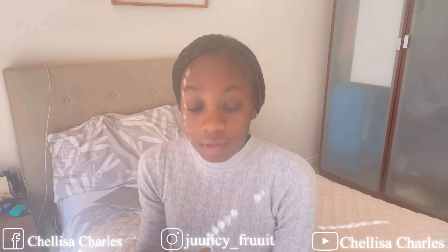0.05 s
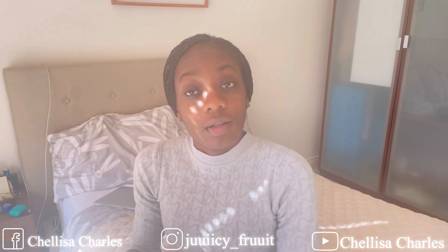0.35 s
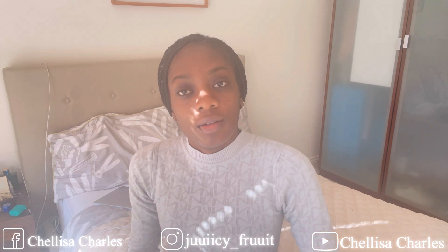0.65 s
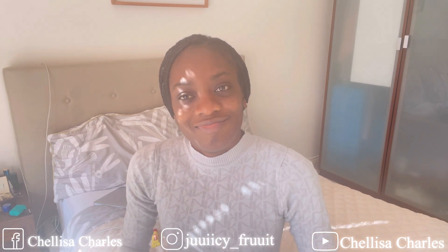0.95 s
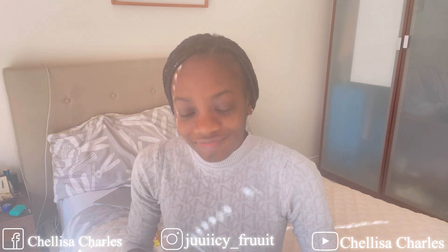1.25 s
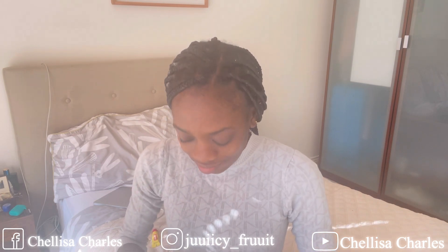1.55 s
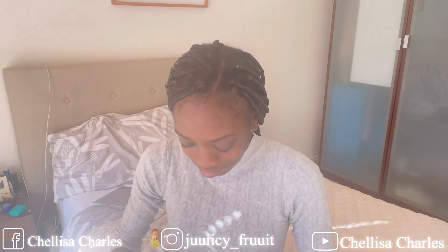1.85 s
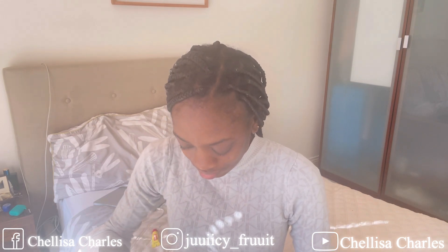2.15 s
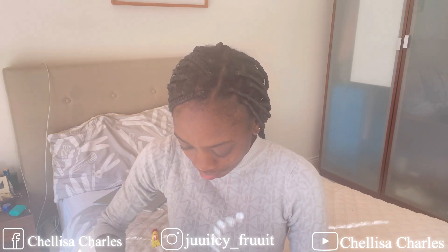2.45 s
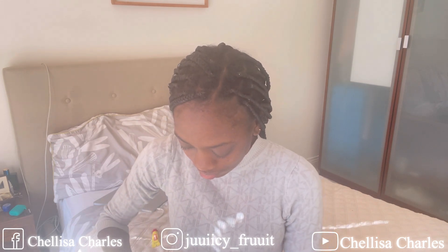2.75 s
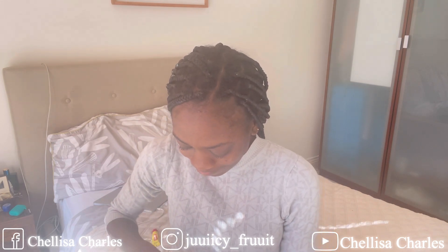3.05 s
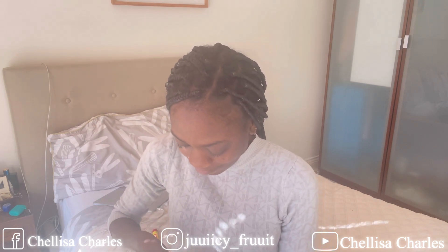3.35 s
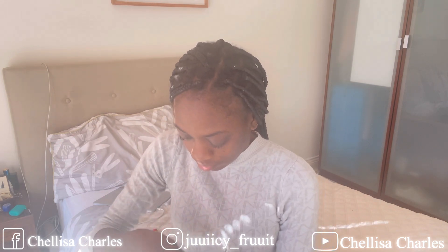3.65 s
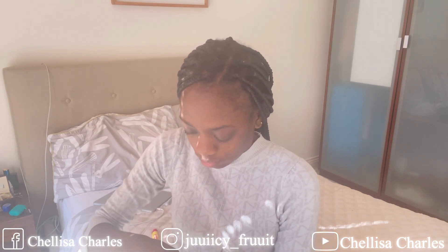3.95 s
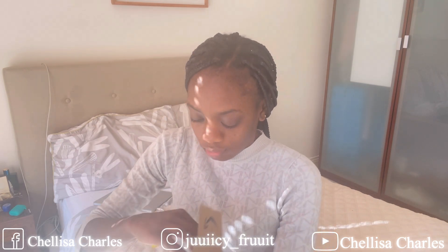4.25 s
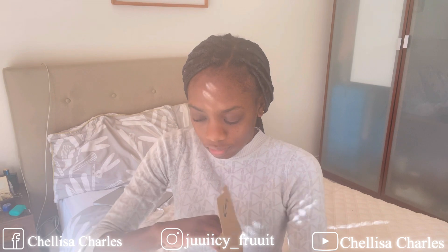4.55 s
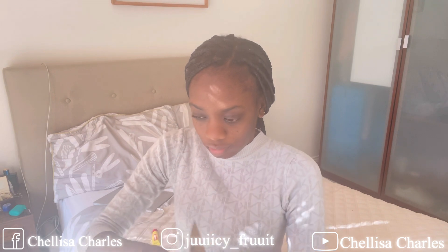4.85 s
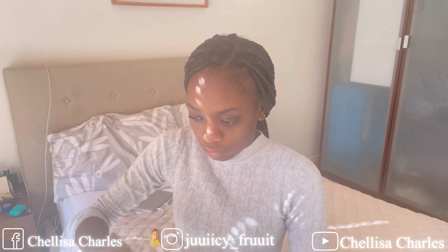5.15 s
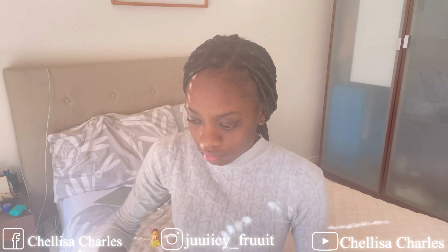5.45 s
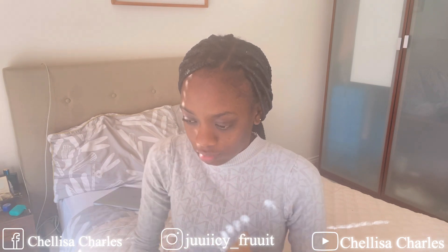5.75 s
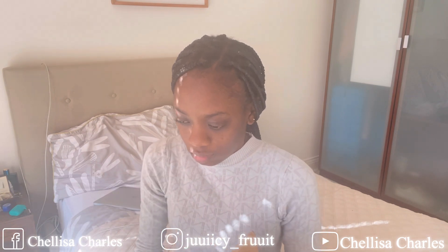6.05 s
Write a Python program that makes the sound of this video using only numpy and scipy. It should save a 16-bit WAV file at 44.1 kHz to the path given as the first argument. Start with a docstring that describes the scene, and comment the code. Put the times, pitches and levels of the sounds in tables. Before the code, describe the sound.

Hands turn a cardboard parcel on a bed, close by in a small bedroom with a short echo and faint steady noise. Paper slides and crinkles softly from the start, with a hollow snap at about 0.5 seconds and a louder one near 1 second. A smaller snap follows at 1.3, then a faint thin hiss swells and fades until about 2.3. A very sharp crack comes at 2.1, followed by light rustling. From about 2.9 to 3.6 seconds one long, loud rip runs in jerks, its fibres crackling and the box ringing hollowly. A deep bump on the bed comes near 3.2, just before the hardest crack of the rip. Another snap and a softer thud land near 3.9. Quieter sliding, crinkling and small taps continue, swelling around 5.7 with a scrape and a low bump, and two last snaps come just after 6 seconds.

```python
"""Paper slides and crinkles under hands as a cardboard parcel is turned on a bed in a small bedroom.
Stiff panels buckle with sharp snaps and a hollow ring; bumps on the bed boom at the lowest room mode.
A thin hiss passes, then one long rip runs in jerks, its breaking fibres making the box sing.
More handling follows. The room echoes briefly over faint steady noise; peaks past full scale clip."""
import sys
import numpy as np
from scipy import signal
from scipy.fft import rfft, irfft, next_fast_len
from scipy.io import wavfile
from scipy.ndimage import uniform_filter1d

SR = 44100
rng = np.random.default_rng(int(sys.argv[2]) if len(sys.argv) > 2 else 0)


def digitize_waveform(pressure):
    """Quantize a signal to 16-bit integers and store it at the path in sys.argv[1].

    Rows of a 2-D input are taken as channels; values are limited to [-1, 1].
    """
    field = np.atleast_2d(pressure).T
    bounded = np.clip(field, -1, 1)
    quanta = np.round(bounded * 32767).astype(np.int16)
    wavfile.write(sys.argv[1], SR, quanta)


N = 273420
TIME_S = np.arange(N) / SR
TAPS = 8192
FILTER_HZ = np.fft.rfftfreq(TAPS, 1 / SR)
BOOM_HZ, BOOM_T60_S = 69.4, 0.37  # lowest room mode


def amp(db):
    """Decibels to gain."""
    return 10 ** (np.asarray(db) / 20)


def unit_rms(x):
    """Scales to rms 1."""
    return x / np.sqrt(np.mean(x ** 2) + 1e-20)


def curve_at(points, hz):
    """Interpolates a table on a log-frequency axis."""
    point_hz, values = np.transpose(points)
    return np.interp(np.log(hz + 1), np.log(point_hz), values)


def add(mix, start_s, sound):
    """Mixes a sound in at start_s."""
    part = mix[max(round(start_s * SR), 0):][:len(sound)]
    part += sound[:len(part)]


def colour(spectrum, modes):
    """Gain curve: a smooth spectrum lifted by modes (centre in Hz, width in Hz, lift in dB)."""
    gain = amp(curve_at(spectrum, FILTER_HZ))
    for hz, width_hz, lift_db in modes:
        bell = 1 / (1 + (2 * (FILTER_HZ - hz) / width_hz) ** 2)
        gain = gain * np.sqrt(1 + (amp(lift_db) ** 2 - 1) * bell)
    return gain


def causal_phase(gain):
    """Minimum-phase factor: the filter starts at once and rings afterwards."""
    log_gain = np.log(np.maximum(gain / gain.max(), 1e-5))
    mirrored = np.concatenate([log_gain, log_gain[-2:0:-1]])
    return np.exp(-1j * signal.hilbert(mirrored).imag[:len(gain)])


def whiten(x):
    """Gives clicks or echoes equal power in every band and energy near 1."""
    spectrum = rfft(x, SR)
    power = uniform_filter1d(abs(spectrum) ** 2, 300, axis=-1)
    return irfft(spectrum / np.sqrt(power + 1e-12))[..., :x.shape[-1]]


def grains(count, per_s, spread_db, hiss):
    """Tiny fibre breaks of very unequal size over a smooth friction hiss."""
    sizes = amp(spread_db * np.minimum(rng.exponential(1, count), 4))
    breaks = sizes * rng.choice([-1, 1], count) * (rng.random(count) < per_s / SR)
    return unit_rms(unit_rms(breaks) + hiss * rng.standard_normal(count))


# Cross-fades between the four bands. Each pair: start in Hz, end in Hz.
CROSSFADES_HZ = [105, 150, 850, 1150, 2500, 5200]


def bands(gain):
    """Splits a gain curve into bump, panel, crinkle and fizz bands, each of power 1."""
    shares = np.repeat(np.eye(4), 2, axis=1)[:, 1:-1]
    return np.array([unit_rms(gain * np.interp(FILTER_HZ, CROSSFADES_HZ, share)) for share in shares])


def friction(drive, gain, band_levels, catch_db, catch_s):
    """Grains ring the sheet under a motion that keeps catching and slipping."""
    knots_s = np.arange(0, TIME_S[-1] + catch_s, catch_s)
    grip = amp(catch_db * np.interp(TIME_S, knots_s, rng.standard_normal(len(knots_s))))
    lead = TAPS // 8
    kernels = np.roll(irfft(bands(gain) * causal_phase(gain)), lead, axis=1)
    parts = signal.oaconvolve(unit_rms(drive * grip)[None], kernels, axes=1)[:, lead:lead + N]
    return (band_levels * parts).sum(0)


def stroke_db(t, start_s, swell_s, ease_s):
    """Level of one stroke: it touches, speeds up, slows down and lets go."""
    touch_db_per_s, lift_db_per_s = 520, 280
    peak_s = start_s + swell_s
    end_s = peak_s + ease_s
    speed_db = np.interp(t, [start_s, peak_s, end_s], [-7, 0, -8.5])
    touch_db = touch_db_per_s * np.minimum(t - start_s, 0)
    lift_db = lift_db_per_s * np.minimum(end_s - t, 0)
    return speed_db + touch_db + lift_db


# Rubbed paper. Each row: frequency in Hz, relative density in dB.
PAPER_SPECTRUM = [(40, -19.5), (110, -15), (160, -8), (250, -3.5), (380, -.5), (700, -3.5), (820, -7),
                  (1020, -.5), (1500, -5.5), (2400, -9.5), (3200, -16), (5000, -16.5), (7500, -27),
                  (11000, -22.5), (15500, -31)]
# A hand or flap slides. Each row: start, swell, ease in seconds; bump, panel, crinkle, fizz in relative dB.
PAPER_STROKES = [(0, .01, .11, -43, -39, -42, -49), (.09, .1, .09, -50, -34, -34, -31.5),
                 (.3, .03, .12, -50, -41, -43, -47), (.45, .05, .06, -52, -33, -43, -51),
                 (.59, .08, .03, -37, -39, -42, -43), (.73, .02, .15, -53, -38, -45, -51),
                 (1.2, .22, .27, -61, -43, -48, -56), (1.76, .06, .07, -61, -44, -42, -49),
                 (1.91, .06, .12, -68, -55, -47, -53), (2.18, .05, .08, -56, -34, -35, -42),
                 (2.36, .1, .12, -53, -39, -41, -46), (2.58, .07, .07, -82, -34, -34, -35),
                 (2.795, .04, .03, -78, -37, -37, -37), (3.67, .02, .06, -46, -38, -58, -74),
                 (3.86, .09, .06, -45, -41, -35, -34), (4.1, .18, .03, -66, -45, -43, -38),
                 (4.33, .06, .03, -45, -36, -36, -42), (4.47, .035, .05, -62, -41, -45, -40),
                 (4.64, .03, .11, -54, -34, -37, -54), (4.785, .04, .14, -35, -35, -36, -34),
                 (4.98, .1, .15, -38, -33, -36, -44), (5.22, .12, .08, -40, -32, -34, -39),
                 (5.42, .08, .1, -37, -27.5, -38, -43), (5.61, .08, .05, -40, -21, -24, -31),
                 (5.74, .02, .13, -35, -27, -27, -41), (5.98, .07, .05, -60, -36, -34, -42),
                 (6.12, .07, .04, -37, -26, -34, -44)]


def handling():
    """Paper rubs on paper and on hands; overlapping strokes add in power."""
    drive = grains(N, per_s=1000, spread_db=4.4, hiss=0.85)
    gain = colour(PAPER_SPECTRUM, [(BOOM_HZ, 18, 7), (385, 80, 3), (540, 70, 3), (670, 70, 3)])
    steps_s, power = TIME_S[::100], 0
    for start_s, swell_s, ease_s, *bands_db in PAPER_STROKES:
        envelope_db = stroke_db(steps_s, start_s, swell_s, ease_s)
        power = power + amp(np.add.outer(bands_db, envelope_db)) ** 2
    levels = np.array([np.interp(TIME_S, steps_s, np.sqrt(band)) for band in power])
    return amp(-0.6) * friction(drive, gain, levels, catch_db=.8, catch_s=0.013)


# Room noise. Each row: frequency in Hz, relative density in dB.
AIR_SPECTRUM = [(30, -22), (70, -2), (130, -6.5), (370, -1), (700, -4), (1000, -14), (2500, -12),
                (5000, -15), (7500, -34), (15500, -36)]


def air():
    """Faint steady room noise, half its power common to both channels."""
    gain = amp(curve_at(AIR_SPECTRUM, np.fft.rfftfreq(N, 1 / SR)))
    left, right, shared = irfft(rfft(rng.standard_normal((3, N))) * gain, N)
    return amp(-57) * unit_rms(np.array([left, right]) + shared)


# Struck cardboard. Each row: frequency in Hz, relative density in dB.
CARD_SPECTRUM = [(40, -15.5), (130, -15), (260, -2), (500, -0.5), (720, 1.5), (1100, -4), (1500, -4),
                 (2400, -5), (3200, -11), (5500, -16.5), (7500, -25), (10500, -23), (15500, -31.5)]


def strike(drive, mode, levels_db, panel_lift_db, bump_re_panel_db):
    """A short force rings a cardboard panel; its bass follows the panel level."""
    ring_db, crinkle_db, fizz_db = levels_db
    panel_db = (ring_db + crinkle_db) / 2 + panel_lift_db
    band_levels = amp([panel_db + bump_re_panel_db, panel_db, crinkle_db, fizz_db])
    gain = band_levels @ bands(colour(CARD_SPECTRUM, [mode]))
    return signal.fftconvolve(drive, irfft(gain * causal_phase(gain)))


# Buckles and taps. Each row: start in seconds, ring in Hz; ring, crinkle, fizz in relative dB.
PANEL_SNAPS = [(.354, 370, -47, -44, -34), (.546, 400, -16, -27.5, -45), (.733, 396, -31, -46, -47),
               (.951, 577, -8.5, -11, -14.5), (1.21, 700, -39, -42, -46), (1.31, 400, -50, -47, -51),
               (1.32, 400, -23, -29.5, -35), (2.101, 820, -18, -17, -37), (2.108, 500, -8, -4, -21),
               (2.341, 297, -34, -41, -58), (2.369, 323, -42, -44, -39), (2.539, 503, -28, -44, -50),
               (2.647, 410, -31, -42, -45), (2.797, 557, -38, -47, -44), (3.254, 678, -15, -25, -30),
               (3.273, 670, -1, -30, -25), (3.369, 712, -13, -26, -40), (3.4, 596, -20, -20, -27),
               (3.523, 690, -24, -20, -25), (3.875, 386, -12, -39, -48), (4.284, 623, -48, -37, -39),
               (4.799, 445, -46, -52, -35), (4.874, 672, -26, -27, -50), (5.144, 222, -27, -50, -62),
               (5.431, 520, -18.5, -39, -65), (5.498, 483, -27, -39, -55), (5.517, 560, -27, -47, -51),
               (5.801, 384, -22, -51, -60), (6.045, 497, -29, -35, -54), (6.125, 674, -15.5, -32, -59)]


def snaps():
    """A panel flips and its crease crumples; the quicker the flip, the cleaner the crack."""
    out, t = np.zeros(N), np.arange(TAPS // 2) / SR
    for start_s, hz, *levels_db in PANEL_SNAPS:
        ring_db, _, fizz_db = levels_db
        crumple_s = max(.0018 + .0001 * (ring_db - fizz_db), .0008)
        drive = grains(len(t), per_s=8000, spread_db=3.0, hiss=0.69) * np.exp(-t / crumple_s)
        drive /= np.linalg.norm(drive)
        drive[0] += 2.1 * np.exp(-crumple_s / 0.0023)  # the clean crack
        snap = strike(whiten(drive), (hz, 140, 2), levels_db, panel_lift_db=-.7, bump_re_panel_db=-32)
        add(out, start_s, snap)
    return amp(30.0) * out


def sing(t, hz, waver_db, drift_rad, step_s):
    """One mode kept going by uneven pushes: its strength and phase wander."""
    knots_s = np.arange(0, t[-1] + step_s, step_s)
    push, shift = rng.standard_normal((len(knots_s), 2)).T
    phase = 2 * np.pi * hz * t + np.interp(t, knots_s, drift_rad * np.cumsum(shift))
    return amp(waver_db * np.interp(t, knots_s, push)) * np.sin(phase)


def box_rings():
    """The hollow note of the cardboard under each snap, each jerk and the running tear."""
    out, t = np.zeros(N), np.arange(TAPS) / SR
    rise_s, t60_s = 0.0014, 0.082
    blows = [(start_s, .004, hz, db) for start_s, hz, db, *_ in PANEL_SNAPS]
    for start_s, length_s, hz, db, *_ in blows + list(TEAR_JERKS):
        envelope = (1 - np.exp(-t / rise_s)) * amp(db - 60 * np.maximum(t - length_s, 0) / t60_s)
        add(out, start_s, envelope * sing(t, hz, waver_db=2.5, drift_rad=0.42, step_s=0.00388))
    pull = pull_db()
    tear_level = amp(-21 + pull + np.minimum(pull + 4, 0))  # sings only under a hard pull
    return out + tear_level * sing(TIME_S, hz=690, waver_db=3, drift_rad=0.8, step_s=.006)


# The parcel bumps the bed. Each row: start in seconds, relative level in dB.
BED_BUMPS = [(.56, -37), (.96, -36), (1.32, -52), (2.112, -33), (2.355, -42), (3.158, -5.5), (3.584, -20),
             (3.886, -18.5), (5.675, -18)]


def thuds():
    """Each bump sets the lowest room mode booming."""
    out, t = np.zeros(N), np.arange(SR) / SR
    envelope = (1 - np.exp(-t / .008)) * amp(-60 * t / BOOM_T60_S)
    boom = envelope * np.sin(2 * np.pi * BOOM_HZ * t)
    for start_s, db in BED_BUMPS:
        add(out, start_s, amp(db) * boom)
    return out


# Thin hiss. Each row: frequency in Hz, relative density in dB.
HISS_SPECTRUM = [(300, -14), (1500, -4), (4900, -4), (5800, -19), (15500, -31)]
# Its resonances. Each row: centre in Hz, width in Hz, lift in dB.
HISS_MODES = [(2420, 200, 16), (3000, 320, 15), (4900, 500, 11)]
# Its envelope: start, swell, ease in seconds; relative level in dB.
HISS_SWELL = (1.4, .28, .6, -47.5)


def thin_hiss():
    """A faint hiss with a few narrow resonances swells and fades like a slow stroke."""
    *timing_s, db = HISS_SWELL
    gain = colour(HISS_SPECTRUM, HISS_MODES)
    hiss = signal.oaconvolve(rng.standard_normal(N), irfft(gain * causal_phase(gain)))[:N]
    return amp(db + stroke_db(TIME_S, *timing_s)) * unit_rms(hiss)


# Fibre bursts. Each row: start, length in seconds; ring in Hz; ring, crinkle, fizz in relative dB.
TEAR_JERKS = [(2.843, .031, 397, -23, -22, -18), (3.074, .028, 544, -19, -10.5, -12),
              (3.124, .033, 645, -6, -8, -12), (3.158, .034, 687, -5, -14, -16.5),
              (3.52, .046, 683, -17, -22, -22), (3.575, .019, 230, -20, -38, -34),
              (3.6, .021, 165, -18, -42, -46), (3.845, .041, 382, -28, -36, -38),
              (3.886, .027, 211, -24, -33, -38), (4.042, .027, 700, -48, -36, -26.5),
              (4.303, .03, 398, -33, -39, -44), (5.672, .036, 647, -25, -22, -35.5)]


def jerks():
    """A run of fibres gives way at once as the tear leaps ahead, or a flap scrapes free."""
    out = np.zeros(N)
    for start_s, length_s, hz, *levels_db in TEAR_JERKS:
        count = int(length_s * SR)
        burst = grains(count, per_s=4000, spread_db=3.0, hiss=0.46) * signal.windows.tukey(count, .4)
        drive = unit_rms(whiten(burst))
        add(out, start_s, strike(drive, (hz, 100, 4), levels_db, panel_lift_db=4, bump_re_panel_db=-28))
    return amp(-0.9) * out


# Pull as the tear starts, then as it runs. Each row: time in seconds, relative crackle level in dB.
PULL_ONSET = [(2.88, -28), (2.992, -40), (3.052, -33), (3.06, -28)]
PULL_RUNNING = [(3.22, -27), (3.266, -30), (3.27, -22), (3.398, -22), (3.402, -16), (3.506, -26),
                (3.528, -17), (3.56, -20), (3.65, -44)]


def pull_db():
    """Pull on the tear in dB relative to a hard pull; it fades outside the rip."""
    hard_pull_db, fade_db_per_s = -20, 1000
    times_s, db = np.vstack([PULL_ONSET, PULL_RUNNING]).T
    outside_s = abs(TIME_S - np.clip(TIME_S, times_s[0], times_s[-1]))
    return np.interp(TIME_S, times_s, db) - hard_pull_db - fade_db_per_s * outside_s


# Breaking fibres. Each row: frequency in Hz, relative density in dB.
FIBRE_SPECTRUM = [(40, -34), (130, -12), (280, -1.5), (430, -5), (520, -6), (900, -10.5), (1600, -12),
                  (2600, -16), (4000, -18.5), (7500, -27), (11000, -26.5), (15500, -35.5)]
# Resonances of the room and hollow box. Each row: centre in Hz, width in Hz, lift in dB.
BOX_MODES = [(69.4, 12, 11), (153, 35, 7), (295, 40, 1.5), (394, 110, 5.5), (675, 70, 12), (1000, 55, 7),
             (1340, 41, 1)]
# Bump, panel, crinkle, fizz of the tear. Each row: relative dB at a hard pull, dB per dB of pull.
TEAR_RESPONSE = [(-38, 1.25), (-16, 1.0), (-16.5, .98), (-24, .5)]


def tearing():
    """The tear front snaps fibres in clumps; a harder pull shakes more of the box and sounds fuller."""
    drive = grains(N, per_s=1150, spread_db=4.5, hiss=.3)
    gain = colour(FIBRE_SPECTRUM, BOX_MODES)
    pull = pull_db()
    levels = np.array([amp(db + growth * pull) for db, growth in TEAR_RESPONSE])
    return amp(-1.4) * friction(drive, gain, levels, catch_db=2.0, catch_s=0.0053)


# Room decay. Each row: frequency in Hz, T60 in seconds.
ECHO_T60 = [(100, 0.38), (300, 0.26), (1000, 0.23), (4000, 0.25), (14000, 0.23)]
# Echo likeness. Each row: frequency in Hz, left-right correlation.
ECHO_CORRELATION = [(100, 0.2), (350, 0.84), (650, -0.23), (1100, -0.27), (2200, 0.08), (6000, -0.41),
                    (13000, 0.4)]


def echo_pattern(wet_db, treble_wet_db, early_db, early_s):
    """Direct sound, dense early echoes off bed and body, and a short tail."""
    hz, t, (left, other) = signal.stft(rng.standard_normal((2, SR // 2)), SR, nperseg=256)
    correlation = curve_at(ECHO_CORRELATION, hz)[:, None]
    right = correlation * left + np.sqrt(1 - correlation ** 2) * other
    tail = amp(-60 * t / curve_at(ECHO_T60, hz)[:, None])
    early_lift = 1 + amp(early_db) * np.exp(-t / early_s)
    echoes = signal.istft(np.array([left, right]) * tail * early_lift, SR, nperseg=256)[1]
    wet = amp(curve_at([(800, wet_db), (8000, treble_wet_db)], np.fft.rfftfreq(SR, 1 / SR)))
    response = irfft(1 + wet * rfft(whiten(echoes), SR))
    return whiten(response[:, :SR // 2])


def room(x, **echo_settings):
    """The echo pattern keeps changing as the parcel moves; long waves reach both channels alike."""
    bass_hz, patterns, crossfade_s = 170, 4, .11
    bass = signal.sosfiltfilt(signal.butter(2, bass_hz, fs=SR, output="sos"), x)
    size, echoed = next_fast_len(N + SR // 2, True), 0
    for k in range(patterns):
        distance = abs((TIME_S / crossfade_s - k) % patterns - patterns / 2)
        share = np.cos(np.pi / 2 * np.minimum(distance, 1))
        echoed = echoed + rfft((x - bass) * share, size) * rfft(echo_pattern(**echo_settings), size)
    return bass + irfft(echoed, size)[:, :N]


def scene():
    """The parcel in the room, a little left of centre."""
    rubbing = handling() + tearing() + thin_hiss()
    rubbed = room(rubbing, wet_db=5.5, treble_wet_db=7.5, early_db=10.5, early_s=0.008)
    cracked = room(snaps() + jerks(), wet_db=7, treble_wet_db=3.5, early_db=0, early_s=0.0079)
    hollow = room(box_rings(), wet_db=-2.5, treble_wet_db=-5.5, early_db=6, early_s=0.012)
    parcel_pan, boom_pan = amp([[-.2], [-.7]]), amp([[1], [-1]])
    return parcel_pan * (rubbed + cracked + hollow) + boom_pan * thuds() + air()


def record(dry):
    """The microphone overloads at full scale; a low-pass then limits the band."""
    lowpass = signal.firwin(511, cutoff=15750, window=("kaiser", 7), fs=SR)
    return signal.oaconvolve(np.clip(dry, -1, 1), lowpass[None], "same")


dry = scene()
out = record(dry)
digitize_waveform(out)
```